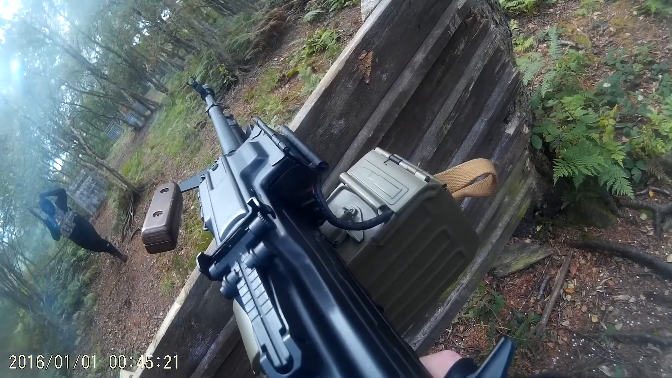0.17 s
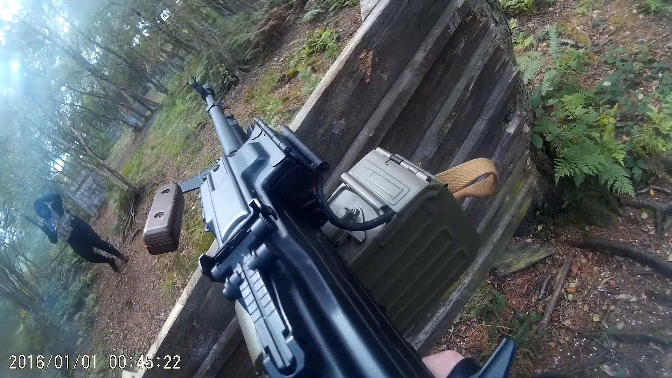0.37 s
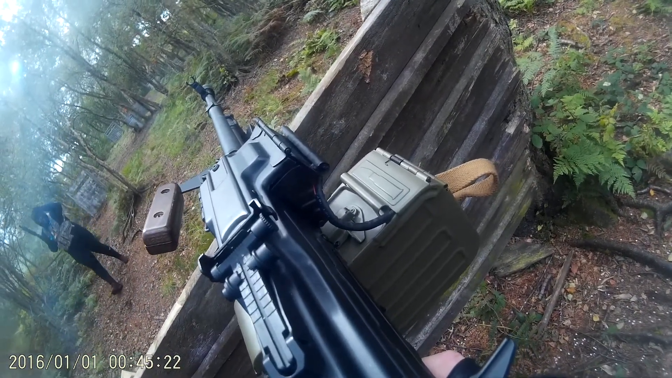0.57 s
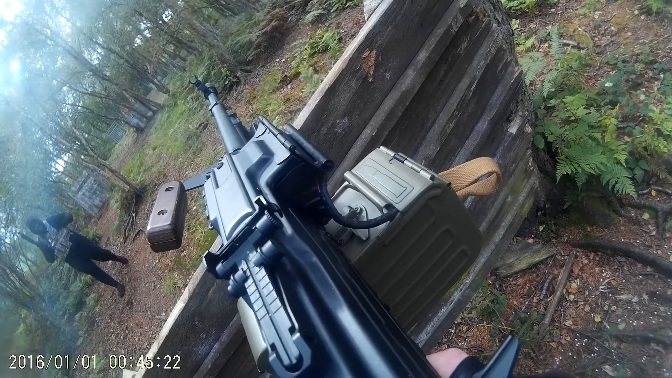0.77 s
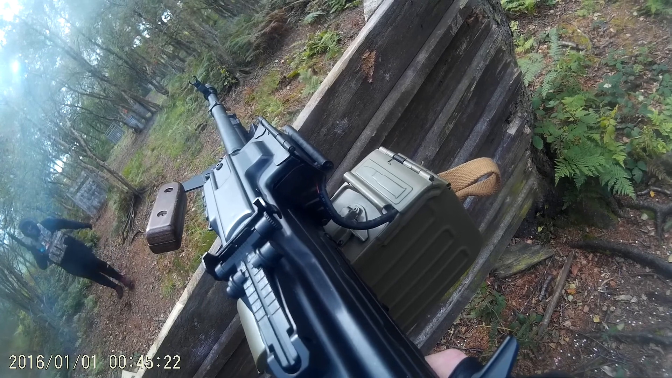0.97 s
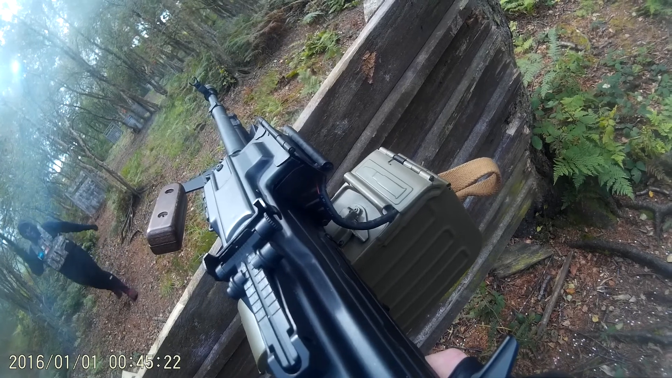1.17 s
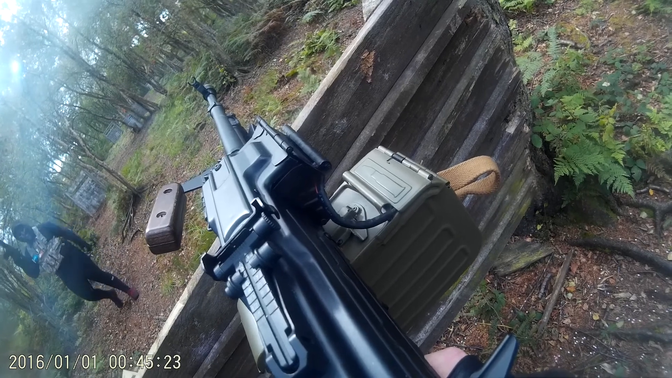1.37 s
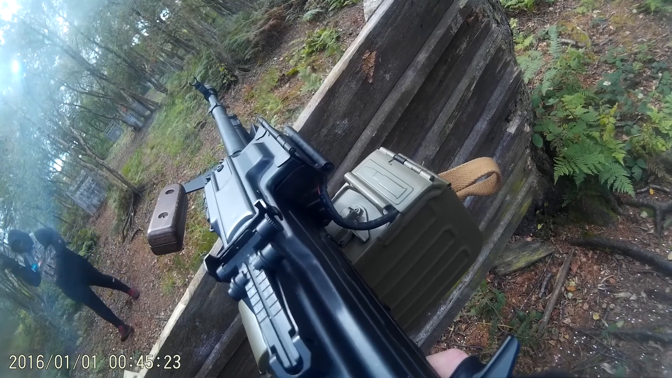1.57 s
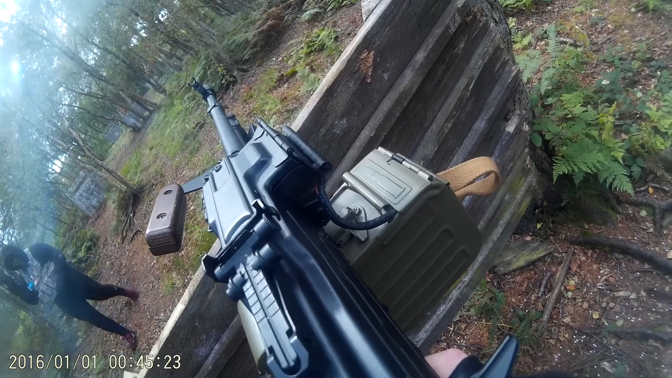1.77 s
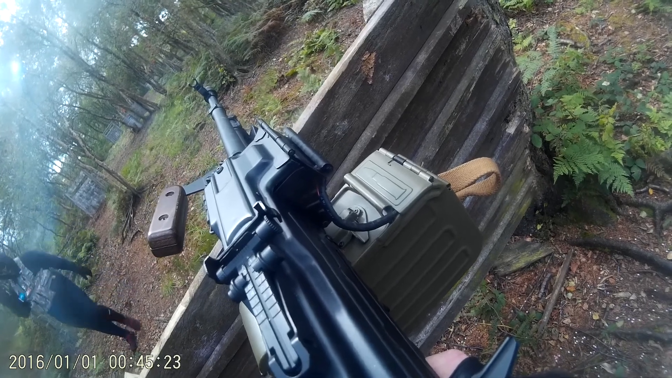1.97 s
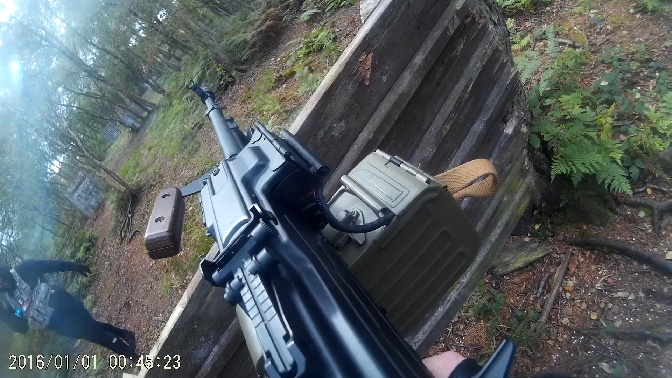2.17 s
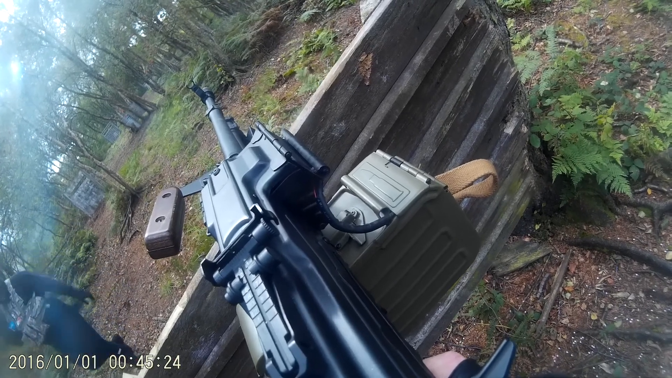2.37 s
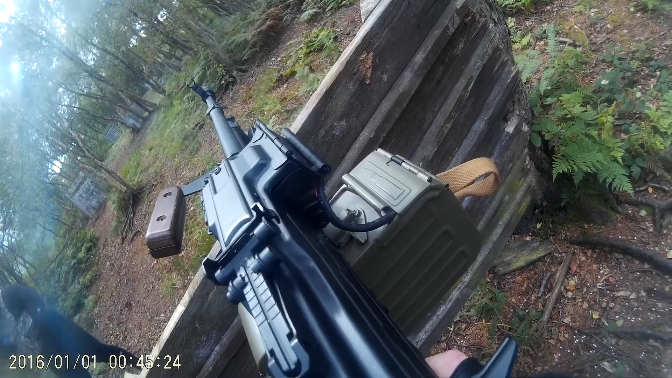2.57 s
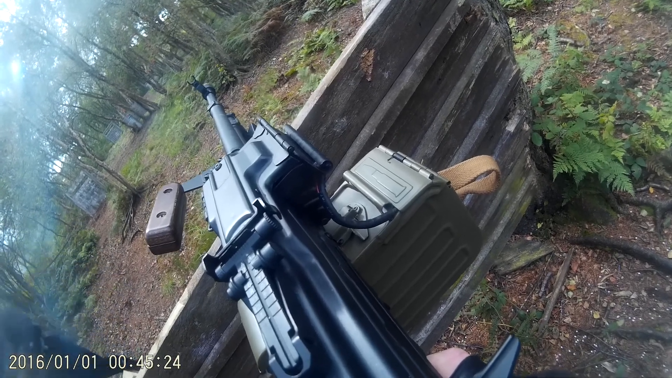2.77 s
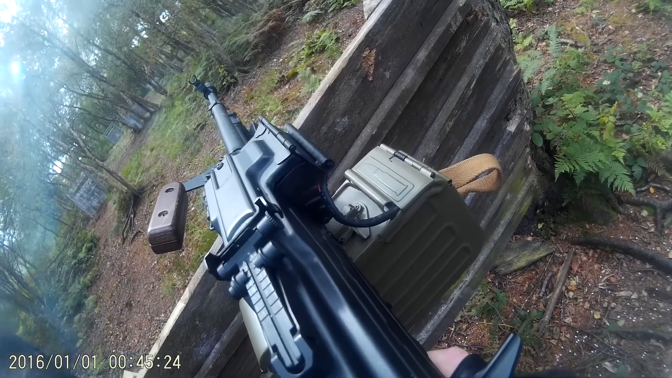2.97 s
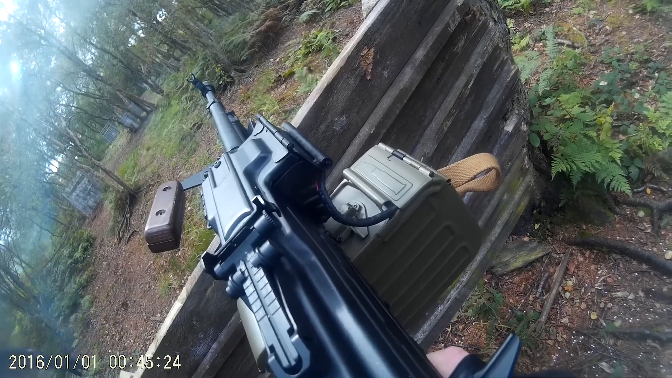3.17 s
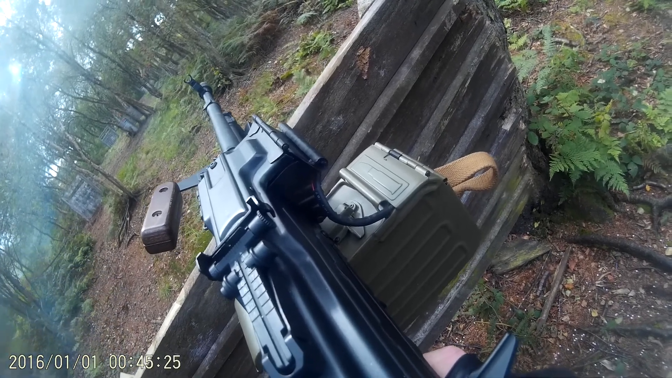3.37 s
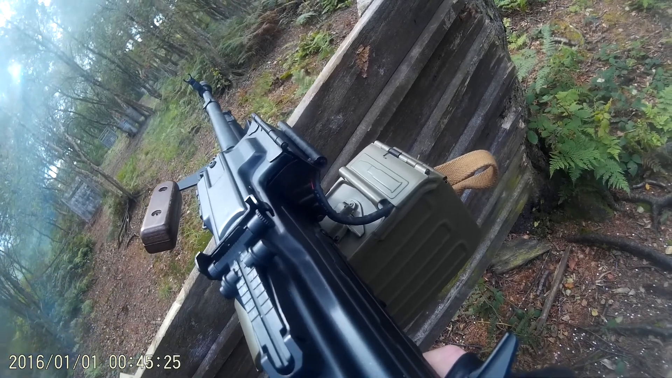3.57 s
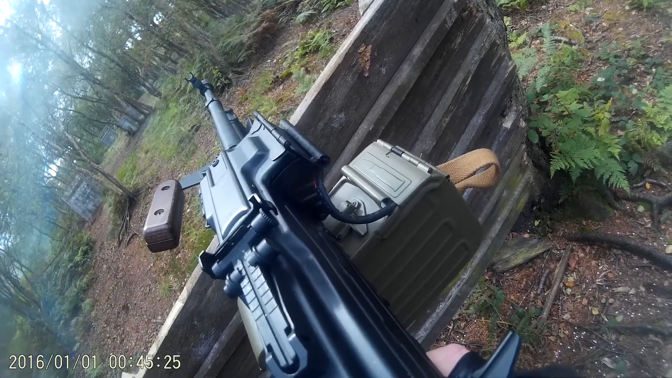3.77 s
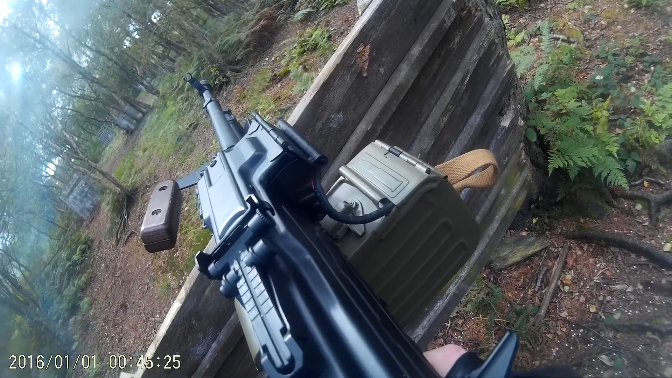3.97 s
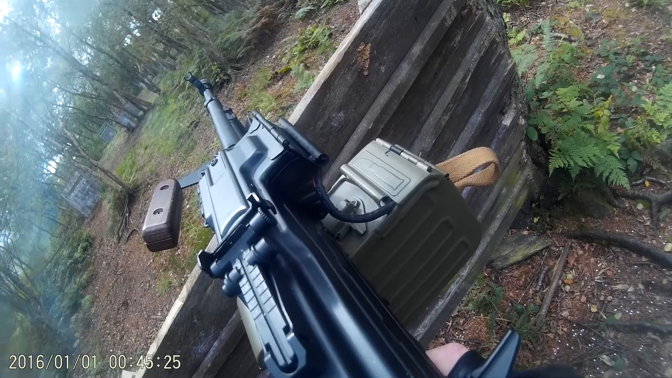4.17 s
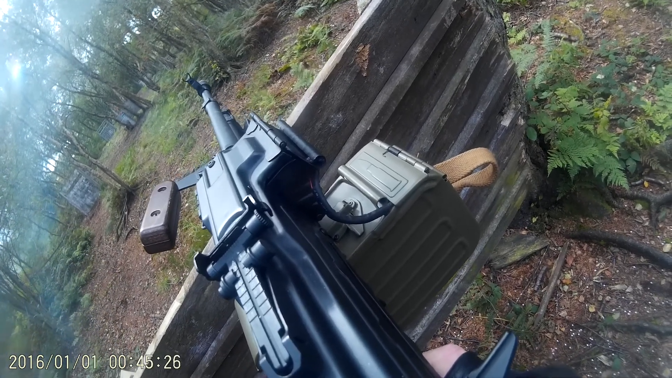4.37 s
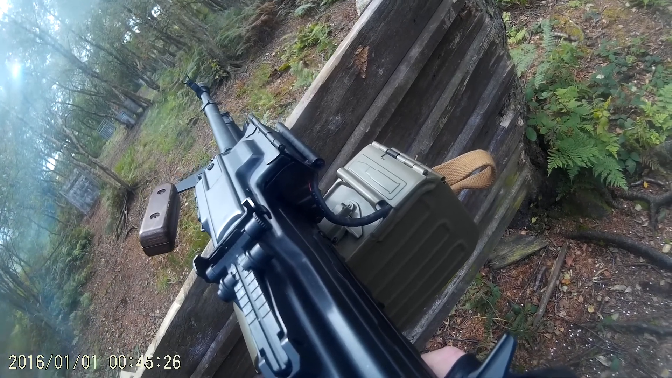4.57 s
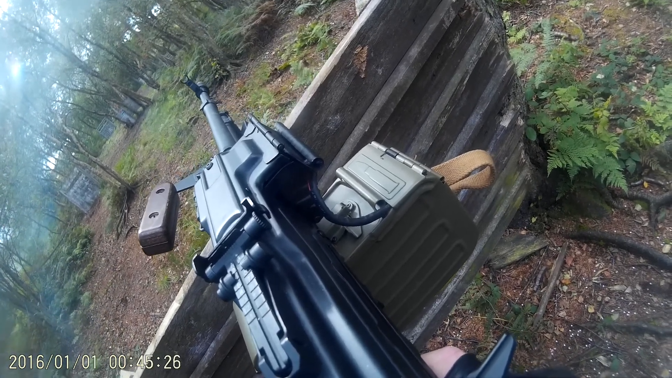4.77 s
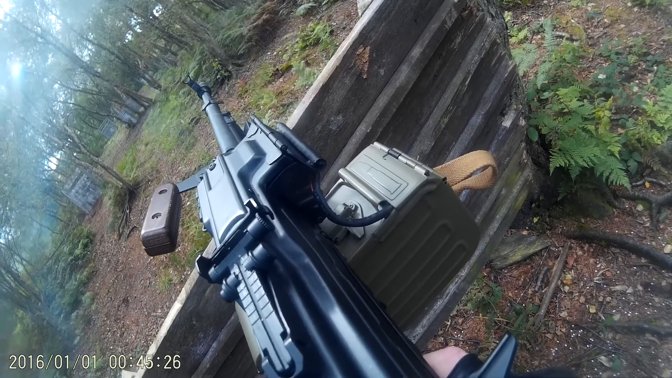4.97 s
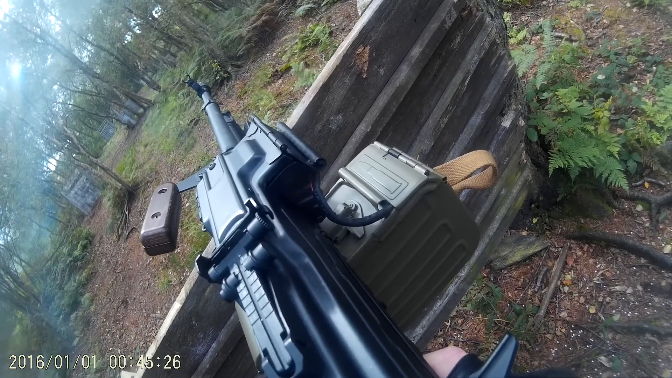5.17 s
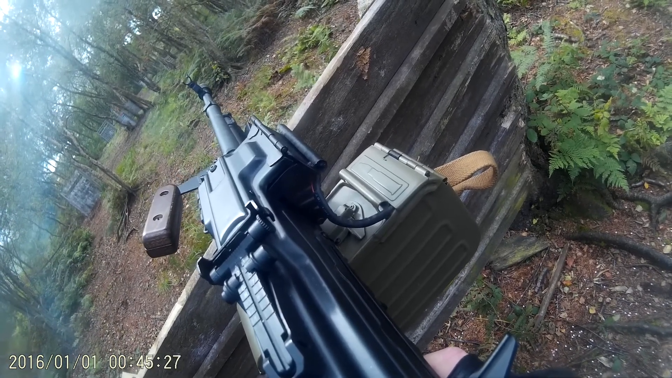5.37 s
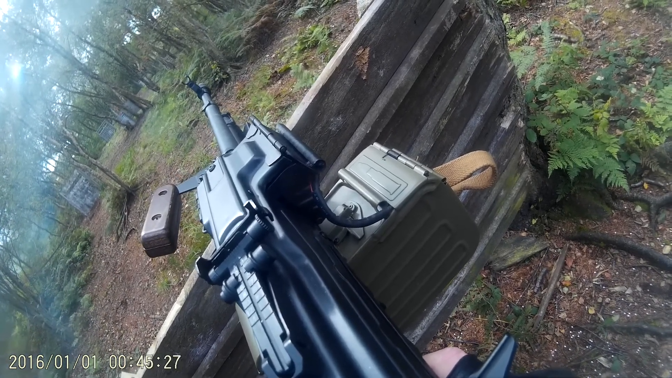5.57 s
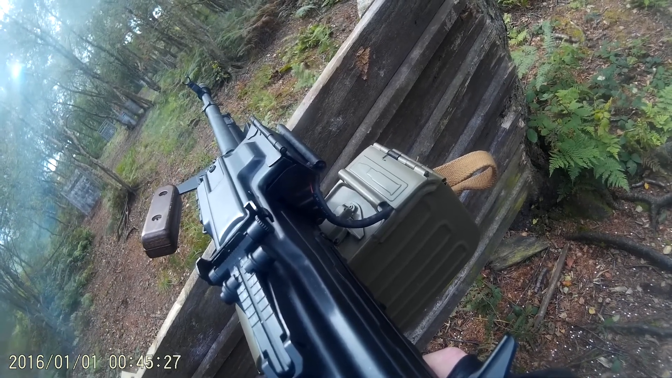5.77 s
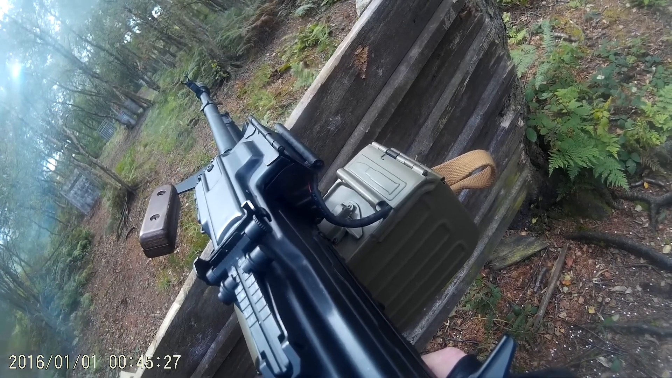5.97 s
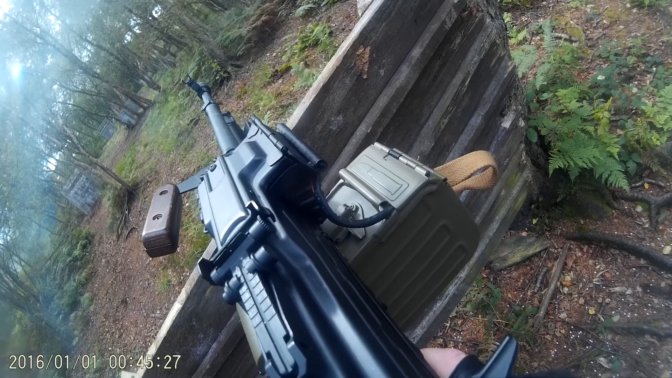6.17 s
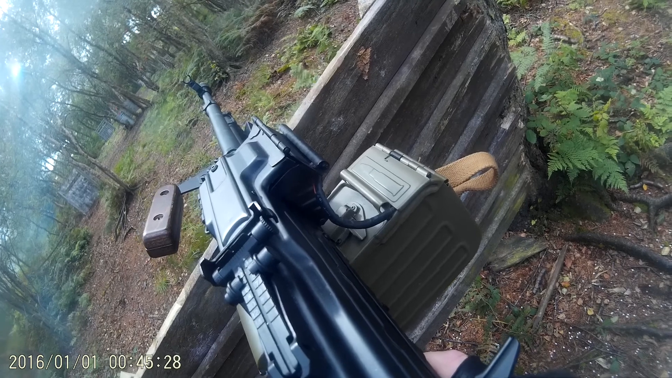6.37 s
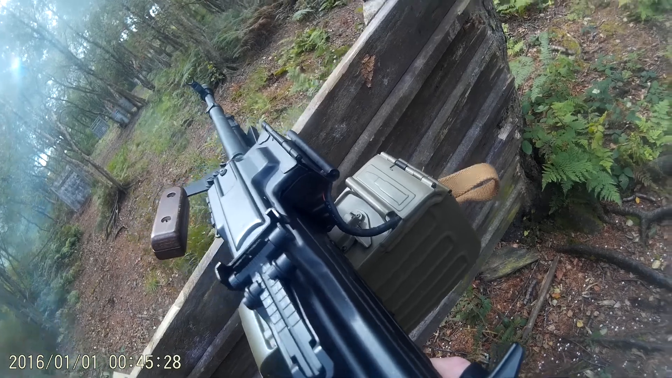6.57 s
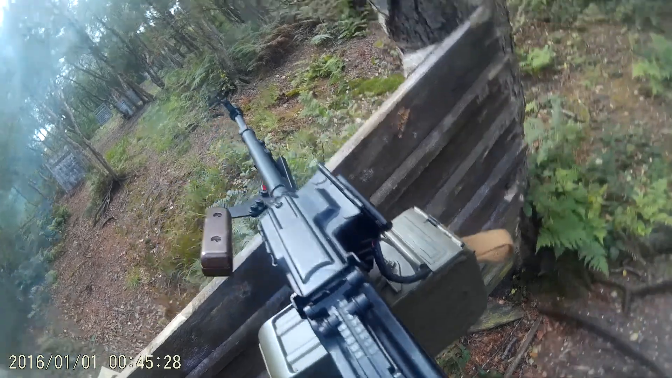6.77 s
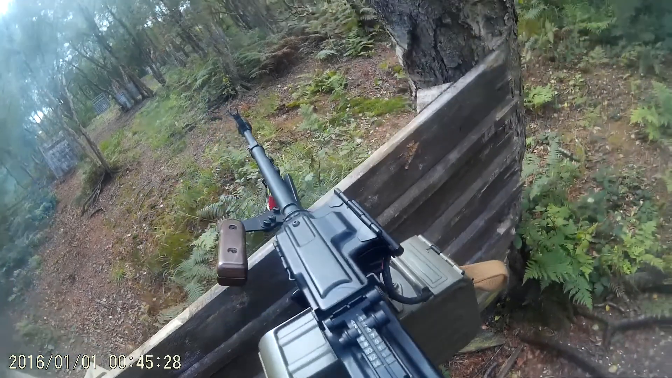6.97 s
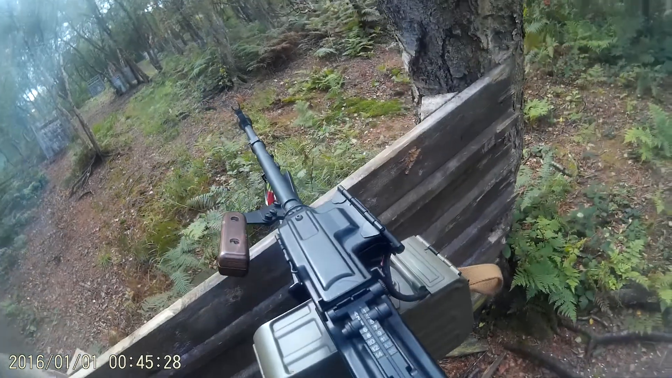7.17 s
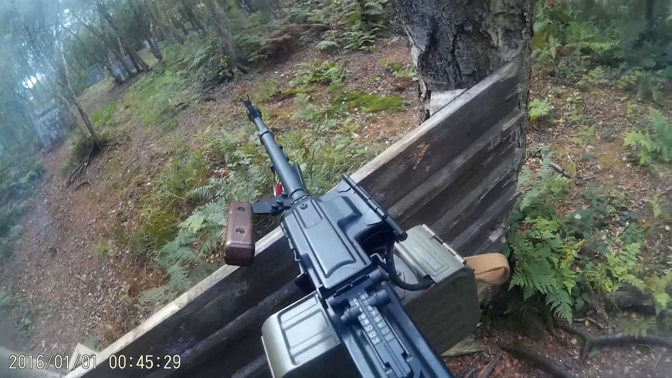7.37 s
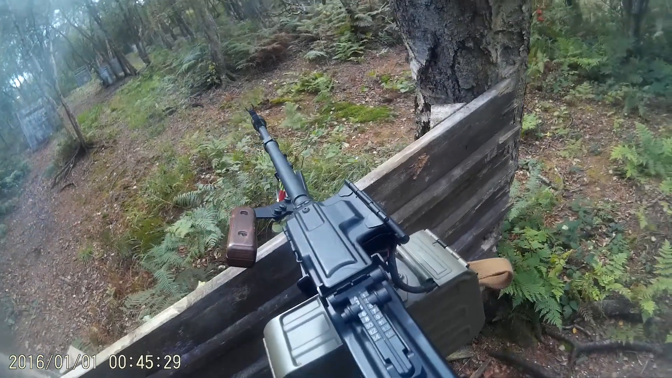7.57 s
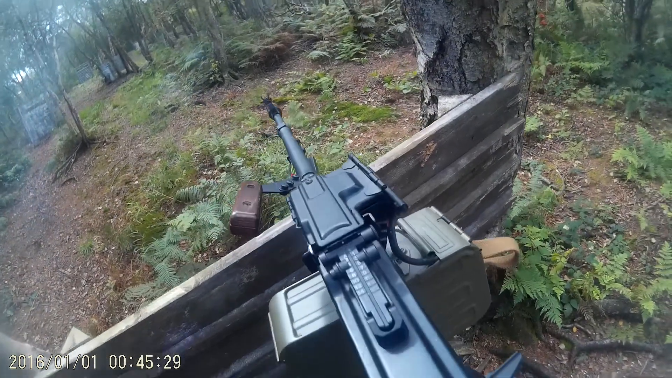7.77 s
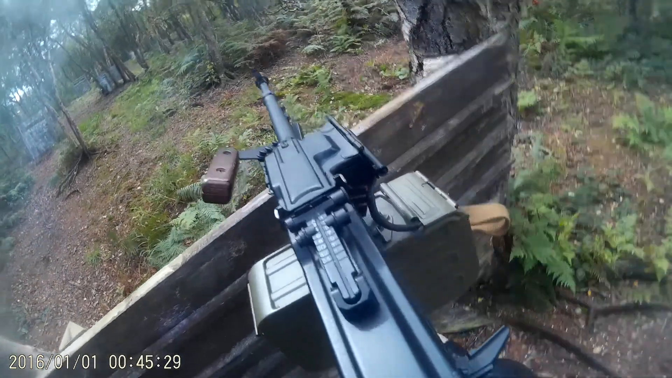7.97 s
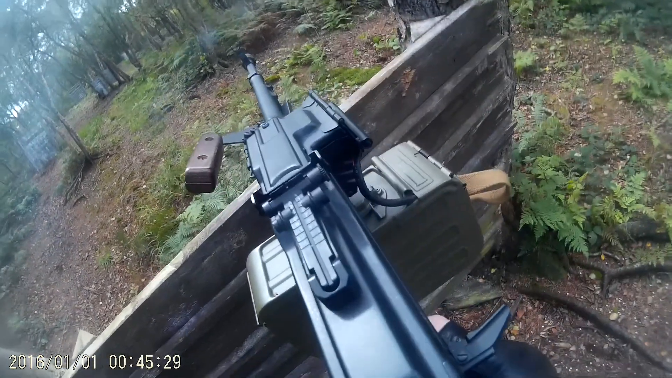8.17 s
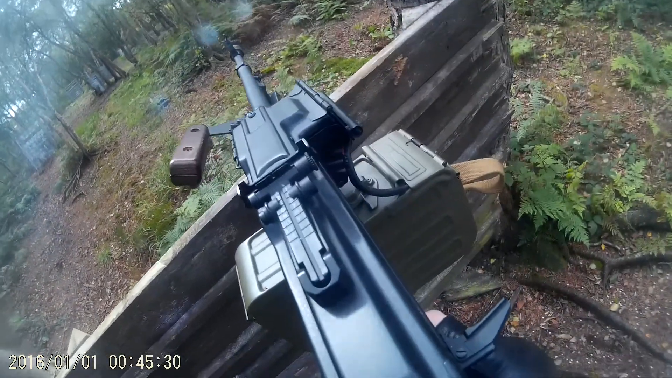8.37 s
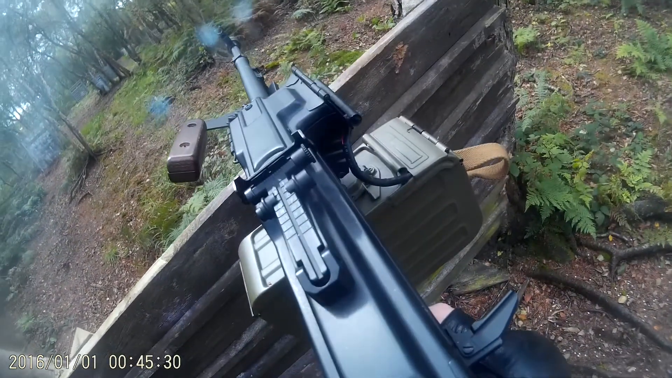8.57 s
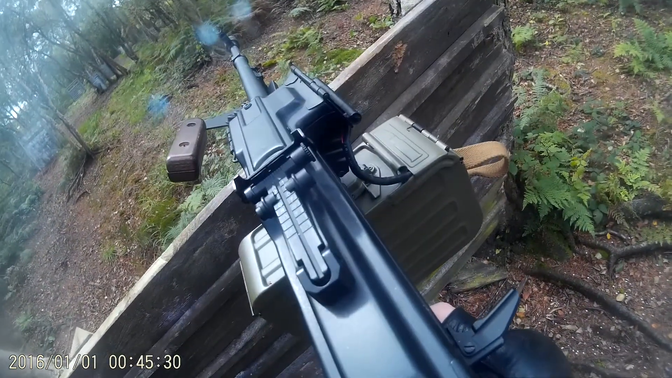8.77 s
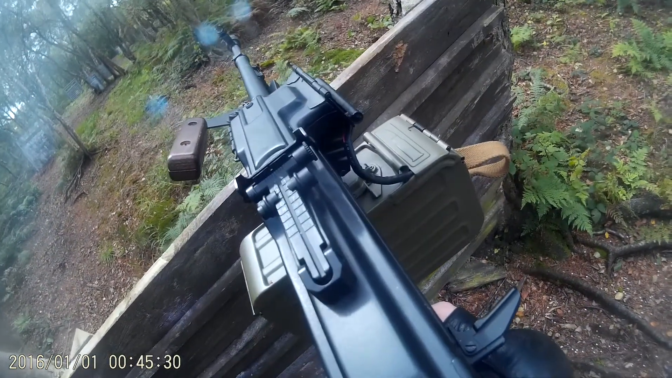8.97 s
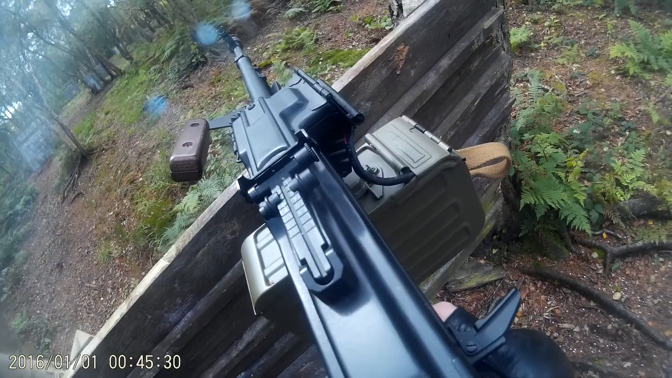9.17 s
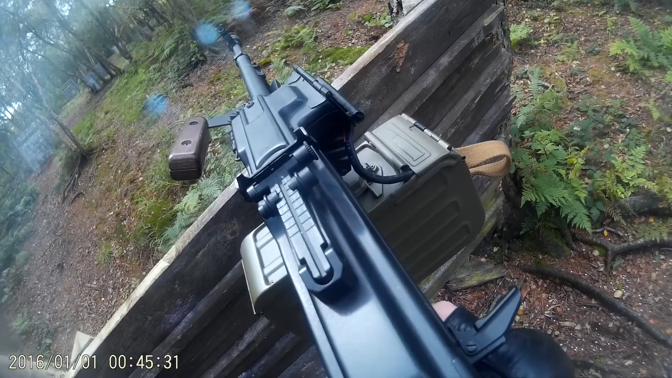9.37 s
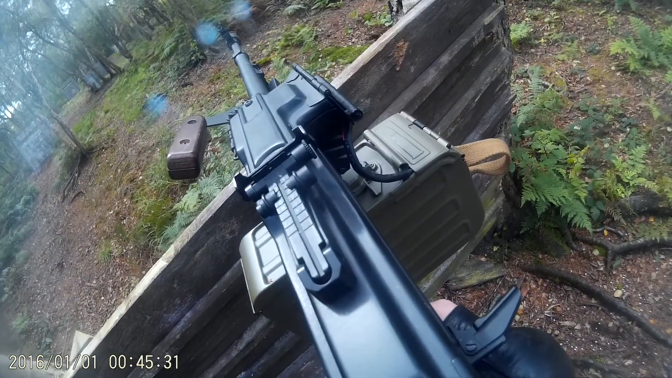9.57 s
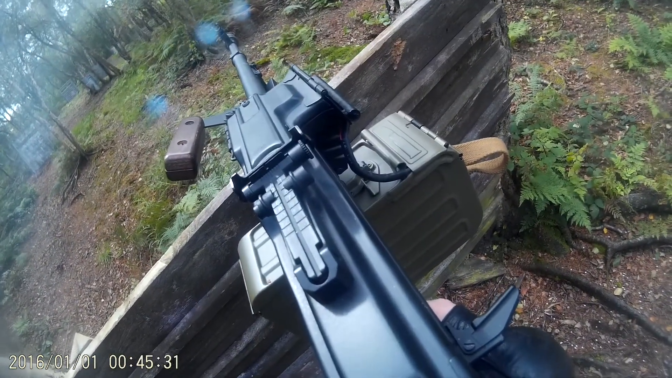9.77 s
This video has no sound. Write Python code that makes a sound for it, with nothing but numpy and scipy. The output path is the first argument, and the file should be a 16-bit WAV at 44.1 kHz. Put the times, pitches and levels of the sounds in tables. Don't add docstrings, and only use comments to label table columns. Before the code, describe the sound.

A battery-driven airsoft machine gun is heard very close, through a small microphone fixed to it, dry and outdoors. It is already firing at 0 s: hard, hollow, ringing clacks at an even fourteen per second, over grinding gear chatter and a whine that pulses with every stroke, loose parts rattling crisply. At about 3.0 s it stops briefly with sharp latch clicks and a short squeak, then resumes at 3.2 s with somewhat stronger low recoil until 6.1 s, ending in a click and quick motor run-down. From 6.2 to 8.2 s it is quiet: faint hiss, a thin high whistle, soft knocks, low rumble and cloth rustle, with handling busier around 8 s. A shorter, heavier-thudding burst runs from 8.3 to 9.6 s. A click and knock follow at 9.7 s, and the motor spins up again from 9.8 s to the end.

```python
import sys
import numpy as np
from scipy import signal
from scipy.fft import rfft, irfft
from scipy.io import wavfile
from scipy.ndimage import uniform_filter1d

SR = 44100
rng = np.random.default_rng(int(sys.argv[2]) if len(sys.argv) > 2 else 0)


def unload_wav(signal):
    wavfile.write(
        sys.argv[1],
        SR,
        np.round(np.clip(np.atleast_2d(signal).T, -1, 1) * 32767).astype(np.int16),
    )


def gain_from_db(level_db):
    decades = np.asarray(level_db, float) / 20
    return 10 ** decades


N = 432614
T = np.arange(N) / SR
HZ = np.fft.rfftfreq(N, 1 / SR) + 1e-3
RUN_DB = -3.1

# time_s, recoil_passed_on_db, shaft_hum_passed_on_db
GRIP = [(0, -59, -72), (.7, -56.5, -73), (1.1, -60, -68), (1.75, -53, -66), (2.35, -61, -78),
        (2.8, -51.5, -52), (3.75, -51.5, -56), (4.15, -47.5, -55), (5, -52, -56), (5.5, -50.5, -51),
        (6.1, -52, -62), (8.32, -39.5, -60), (8.4, -48, -62), (8.62, -40, -66), (8.8, -42, -68),
        (8.9, -38.2, -62), (9.6, -40, -62)]


def level(x, db):
    return x * gain_from_db(db) / np.sqrt(np.mean(x ** 2))


def band(hz, width):
    return 1 / (1 + 1j * (HZ - hz ** 2 / HZ) / width)


def noise(gain):
    return level(irfft(rfft(rng.standard_normal(N)) * gain, N), 0)


def walk(rate_hz):
    return noise(1 / (1 + (HZ / rate_hz) ** 2))


def even(x):
    return level(x / uniform_filter1d(x ** 2, size=96) ** .35, 0)


def points(table):
    hz, db = np.transpose(table)
    return gain_from_db(np.interp(np.log(HZ), np.log(hz), db))


def strike(times, gains, shape):
    hits = np.zeros(N)
    at = np.round(np.asarray(times) * SR).astype(int)
    inside = (at >= 0) & (at < N)
    np.add.at(hits, at[inside], (gains * np.ones(len(at)))[inside])
    return signal.oaconvolve(hits, shape)[:N]


def fade(decay_ms):
    ms = np.arange(int(8 * decay_ms * SR / 1000)) / SR * 1000
    return (1 - np.exp(-ms / .3)) * np.exp(-ms / decay_ms)


def ring(hz, t60, rise_ms):
    t = np.arange(int(t60 * SR)) / SR
    decay = gain_from_db(-60 * t / t60)
    return np.sin(2 * np.pi * hz * t) * decay * (1 - np.exp(-1000 * t / rise_ms)) ** 2


def swell(hz, length_ms):
    samples = length_ms * SR / 1000
    share = np.arange(int(samples)) / samples
    envelope = np.sin(np.pi * share ** np.clip(length_ms / 60, .25, .75)) ** 1.8
    return envelope * np.sin(2 * np.pi * hz * share * length_ms / 1000)


def choked(hz, rise_ms, fall_ms, length_ms):
    ms = np.arange(int(length_ms * SR / 1000)) * 1000 / SR
    stop = np.clip((length_ms - ms) / 1.2, 0, 1)
    shape = (1 - np.exp(-ms / rise_ms)) * np.exp(-ms / fall_ms) * stop
    return -shape * np.sin(2 * np.pi * hz * ms / 1000)


def housing():
    # centre_hz, width_hz, level_db
    resonances = [(120, 100, -21), (308, 64, -5.5), (389, 33, -11.5), (800, 180, -5), (1000, 600, -9.5),
                  (1240, 53, 0), (1730, 200, 3), (2100, 420, 0), (2712, 314, 0.5), (3480, 850, -6.5),
                  (3910, 320, -4.5), (4640, 1440, -7.5), (4915, 174, -11), (5907, 230, -5.5),
                  (6870, 540, -12.5), (7450, 500, -17), (7880, 500, -14), (8330, 1600, -23),
                  (10070, 900, -27), (11380, 1600, -19.5), (13500, 1500, -29.5)]
    return np.sqrt(sum(gain_from_db(db) ** 2 * abs(band(hz, width)) ** 4 for hz, width, db in resonances))


def quiet(body, drive):
    # time_s, body_movement_db, cloth_rubbing_db
    moving = [(2.7, -66, -60), (3.075, -57, -53), (3.105, -58, -65), (6.27, -61, -71), (6.47, -67.5, -78),
              (6.67, -64, -81), (6.9, -65, -74), (7.32, -65, -87), (7.56, -62, -72), (7.7, -64, -88),
              (7.85, -58.5, -67), (8.01, -54, -65), (8.12, -51, -61), (8.2, -52, -72), (9.71, -67, -61),
              (9.79, -63, -63)]
    # corner_hz, level_db
    rumble_colour = [(71, -40), (120, -10.5), (162, -6.5), (227, -4.5), (351, -6.5), (384, -5),
                     (1000, -27.5), (1300, -51.5), (2200, -120)]
    # corner_hz, level_db
    hiss_colour = [(300, 7), (1000, 5.5), (3000, -5), (6000, -5.5), (15000, -8.5), (15900, -41)]
    # start_s, end_s, extra_hiss_db
    brush = (7.19, 7.41, 3.5)
    times, move_points, rustle_points = np.transpose(moving)
    move_db, rustle_db = np.interp(T, times, move_points), np.interp(T, times, rustle_points)
    effort_db = move_db + 65

    last_loud = np.maximum.accumulate(np.where(drive > gain_from_db(RUN_DB - 20), T, -1))
    gate_close_s = .09
    gate_db = np.maximum(9 * np.exp((last_loud - T) / gate_close_s), .55 * effort_db)
    brush_db = brush[2] * uniform_filter1d(1. * (T > brush[0]) * (T < brush[1]), size=400)

    rumble = noise(points(rumble_colour)) * gain_from_db(move_db - 4.0 + 2.5 * walk(10))
    sway = noise(band(55, 75) ** 2) * gain_from_db(-67.5 + 1.1 * effort_db + 2.2 * walk(5.2))
    cloth = body * (band(1700, 119) + .6 * band(1500, 1400))
    rustle = noise(cloth) * gain_from_db(rustle_db + 1.0 + 2.0 * walk(24))
    hiss = noise(points(hiss_colour)) * gain_from_db(-69 + .8 * gate_db + brush_db)
    whistle = gain_from_db(-74 + gate_db) * np.sin(2 * np.pi * 6804 * T)
    return rumble + sway + rustle + hiss + whistle


def handling(body):
    # start_s, peak_db, centre_hz, width_hz, decay_ms
    clicks = [(3.064, -42, 3000, 9000, 3), (3.067, -28, 2130, 3000, 3.8), (3.114, -36.5, 1970, 4000, 4.5),
              (6.089, -25, 3500, 5000, 2.5), (6.198, -45, 1500, 1500, 10), (6.232, -55, 1200, 1500, 5.7),
              (7.0987, -62, 1700, 1000, 3), (7.373, -57, 6500, 3500, 3), (7.377, -56, 6000, 14000, 6),
              (7.994, -52, 1230, 600, 3.2), (8.031, -44, 1220, 600, 2.8), (8.0567, -45, 10100, 9000, 1.5),
              (8.0902, -39, 2000, 2600, 3.5), (8.183, -55, 1550, 1500, 4), (8.123, -57, 1200, 1500, 2.7),
              (8.103, -58, 1990, 900, 8.1), (9.694, -29.5, 2010, 3500, 5.2), (9.803, -50, 2950, 6000, 1.8)]
    # start_s, level_db, pitch_hz, length_ms
    squeaks = [(3.155, -27, 1240, 34), (7.377, -55, 1260, 14), (7.377, -56, 2120, 12),
               (8.09, -28, 1250, 11), (8.0902, -34, 2000, 14), (8.09, -33, 1600, 6.8),
               (8.26, -36, 1980, 91), (8.275, -41, 5900, 44), (9.733, -45, 1230, 34),
               (9.735, -53, 2550, 26)]
    # start_s, peak_db, ring_hz, thud_db
    knocks = [(6.502, -51, 280, -60), (6.837, -59, 167, -68), (7.111, -50, 237, -54), (7.25, -57, 245, -70),
              (7.829, -40, 196, -47), (7.893, -46, 203, -56), (7.99, -31.5, 300, -46),
              (8.027, -37.5, 404, -53), (8.09, -41, 420, -45), (8.115, -40, 151, -46),
              (8.181, -40, 300, -47), (9.697, -41, 434, -62)]
    out = np.zeros(N)
    for s, db, hz, width, decay_ms in clicks:
        out += strike([s], gain_from_db(db + 2.5), fade(decay_ms)) * noise(body * band(hz, width) ** 2)
    for s, db, hz, length_ms in squeaks:
        out += strike([s], gain_from_db(db), swell(hz, length_ms))
    for s, db, hz, thud_db in knocks:
        out += strike([s], gain_from_db(db + 3), ring(hz, 0.051, 0.86))
        out += strike([s + 0.0029], gain_from_db(db - 5.5), ring(425, 0.065, 1.7))
        out += strike([s], gain_from_db(thud_db + 8.5), ring(65, .2, 3.1))
    return out


def motor():
    # pulled_s, let_go_s, gears_stall_s, freewheel_after_stall_db
    trigger = [
        (-1, 2.99, 3.055, -32),
        (3.11, 6.115, 6.153, -12),
        (8.205, 9.625, 9.688, -19),
        (9.79, 11, 12, -30),
    ]
    spin_up_s, bite_s, coast_s, freewheel_s = .048, .031, .082, .05
    speed, gain = np.zeros(N), np.full(N, 1e-4)
    for pull, release, stall, free_db in trigger:
        since = np.clip(T - pull, 0, None)
        coast = np.clip(1 - (T - release) / coast_s, 0, 1) * (T < stall)
        speed += (1 - np.exp(-since / spin_up_s)) * coast
        gain += ((1 - np.exp(-since / bite_s)) * coast) ** 1.9
        gain += gain_from_db(free_db) * np.exp(-np.clip(T - stall, 0, None) / freewheel_s) * (T >= stall)
    return speed, gain_from_db(RUN_DB) * uniform_filter1d(gain, size=260)


def gears(body, shots, speed, drive):
    # from_blow_ms, grind_db, whine_db, speed_share
    cycle = [
        (-35, -.5, -5.5, 1.06),
        (-28, 0, -1, 1.02),
        (-18.5, .5, 0, .98),
        (-11.5, -6, -20, .97),
        (-5, -6, -20, 1.02),
        (0, -2, -14, 1.05),
        (14, -1.7, -8.5, 1.095),
        (25, -1.5, -8, 1.11),
        (36, -.5, -5.5, 1.065),
    ]
    # multiple, level_before_housing_db
    mesh = [(1, -41), (2, -35), (3, -41.5)]
    shots = np.append(shots, 1e3)
    coming = np.searchsorted(shots, T)
    before = T - shots[coming]
    after = T - np.append(shots[0] - .071, shots)[coming]
    ms = 1000 * np.where(before > cycle[0][0] / 1000, before, after)
    cycle_ms, *columns = np.transpose(cycle)
    grind_db, whine_db, load = (np.interp(ms, cycle_ms, column) for column in columns)

    chatter = noise(body) * gain_from_db(-32.5 + grind_db + 2.0 * walk(150))
    mesh_hz = 2490 * speed * load * (1 + .016 * walk(90))
    phase = 2 * np.pi * np.cumsum(mesh_hz) / SR
    whine = sum(gain_from_db(db + .8 * k * whine_db + 2.2 * walk(60)) * np.sin(k * phase) for k, db in mesh)
    whine = irfft(rfft(whine) * body ** 1.01, N) * gain_from_db(9.5)
    hum_db = np.interp(T, *np.transpose(GRIP)[::2]) + 0.3 + 3.0 * walk(3)
    hum = noise(band(152.1, 39) ** 2) * gain_from_db(hum_db)
    return drive * (chatter + whine * np.clip(speed, 0, 1) ** 1.8 + hum)


def blows():
    # first_blow_s, blows, period_ms, first_gap_longer_by_ms, last_blow_late_by_ms
    bursts = [
        (.0513, 42, 70.955, 0, 0),
        (3.1872, 42, 71.17, 14.1, 13),
        (8.3204, 19, 70.58, 5.9, 0),
    ]
    burst_db = [-23.1, -23.0, -24.4]
    catch_up, sag_ms, jitter_ms = .16, .0055, .2
    s, ring_db = [], []
    for (first, count, period, lag, late), db in zip(bursts, burst_db):
        k = np.arange(count)
        ms = k * period + sag_ms * k ** 2 / 2
        ms = ms + lag * (1 - catch_up ** k) / (1 - catch_up) + late * (k == count - 1)
        s = np.append(s, first + ms / 1000)
        ring_db = np.append(ring_db, db + 0 * k)
    chance = rng.standard_normal((len(s), 3)).T
    thud_db = np.interp(s, *np.transpose(GRIP)[:2]) + 1.0 * chance[2]
    return s + jitter_ms / 1000 * chance[0], ring_db + .6 * chance[1], thud_db


def shell(s, ring_db):
    # pitch_hz, level_db, start_ms, rise_ms, fall_ms, choked_after_ms
    modes = [(545, -15, -1.2, .3, 7, 11), (680, -.5, -1.2, .3, 5.5, 11), (790, -4, -1.2, .3, 4.5, 11),
             (935, 5.5, -1.2, .3, 5.5, 11), (1240, 6.8, -1.2, .9, 12, 12.6), (1610, 0, -2.4, 3, 14, 16),
             (1745, 3.5, 6.2, 1.5, 5, 10.5), (1720, -7, -5.4, 2, 9, 6), (1950, 0, 5.2, 1.5, 6, 11),
             (2030, -9, -5.4, 2, 9, 6), (2640, -3, 3.6, 2, 6, 9), (3250, -8, -.5, .5, 5, 7)]
    out = np.zeros(N)
    for hz, db, ms, rise, fall, length in modes:
        chance = rng.standard_normal((len(s), 2)).T
        gains = gain_from_db(ring_db + db - 1.16 + .8 * chance[1])
        out += strike(s + ms / 1000 + 2.5e-5 * chance[0], gains, choked(hz, rise, fall, length))
    return signal.sosfilt(signal.butter(4, 520, "high", fs=SR, output="sos"), out)


def rattles(body, s, drive):
    # from_blow_ms, level_db, centre_hz, width_hz, decay_ms, scatter_db
    parts = [(-16, -38, 2200, 600, 3.5, 2), (-17, -43, 900, 900, 8, 2), (-9.5, -51, 9500, 6000, 1.2, 2),
             (-5.5, -33, 1900, 900, 3, 1.5), (-5.5, -38, 7000, 9000, 2, 1.5), (-3, -33, 7000, 14000, 3, 1),
             (-2.2, -28, 4680, 700, 1.6, 1.2), (-2, -29, 1750, 500, 4, 1), (1, -37.5, 1000, 500, 20, 1.5),
             (3.2, -29, 5000, 14000, 1.5, 1.5), (6.6, -29, 6000, 14000, 1.2, 1),
             (11, -34, 5000, 14000, 1.5, 2), (12.5, -46, 7200, 500, 3, 2), (14.8, -33, 5500, 14000, 1.5, 2),
             (36, -37.5, 1850, 400, 3.5, 2)]
    out = np.zeros(N)
    running = np.minimum(drive * gain_from_db(7), 1)
    for ms, db, hz, width, decay_ms, scatter in parts:
        chance = rng.standard_normal((len(s), 2)).T
        gains = gain_from_db(db + 5.46 + scatter * chance[1])
        burst = strike(s + ms / 1000 + 2.5e-4 * chance[0], gains, fade(decay_ms))
        out += running * burst * even(noise(body * band(hz, width) ** 2))
    return out


def recoil(s, thud_db):
    # pitch_hz, level_db, t60_s, growth_beyond_thud (dB per dB)
    frame = [(67.4, -3.5, 0.29, 0.55), (84.8, -11, 0.25, 0.19), (101, -2, 0.12, -0.3),
             (292.7, -6.5, .14, -0.31), (388.7, -7, 0.07, -0.93)]
    out = np.zeros(N)
    for hz, db, t60, growth in frame:
        kick_db = thud_db + db + 9 + growth * (thud_db + 43)
        out += strike(s + .002 - 1.4 / hz, -gain_from_db(kick_db), ring(hz, t60, 430 / hz))
    return out


def scene():
    body = housing()
    s, ring_db, thud_db = blows()
    speed, drive = motor()
    background = quiet(body, drive) + handling(body)
    gun = gears(body, s, speed, drive)
    gun += shell(s, ring_db) + rattles(body, s, drive) + recoil(s, thud_db)
    gun = irfft(rfft(gun) * (1 - 0.66 * band(1354, 110)), N)
    return (gun + background)[None]


def band_limit(x):
    return signal.sosfilt(signal.butter(12, 15810, fs=SR, output="sos"), x)


def record(dry):
    mix = signal.sosfilt(signal.butter(3, 36, "high", fs=SR, output="sos"), dry)
    return band_limit(mix)


dry = scene()
out = record(dry)
unload_wav(out)
```